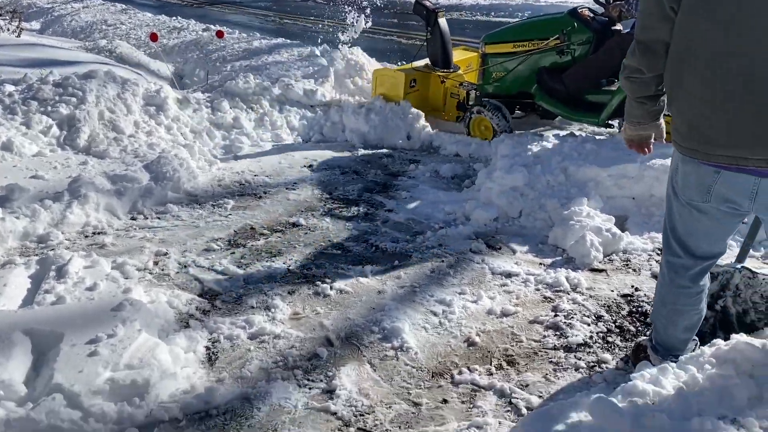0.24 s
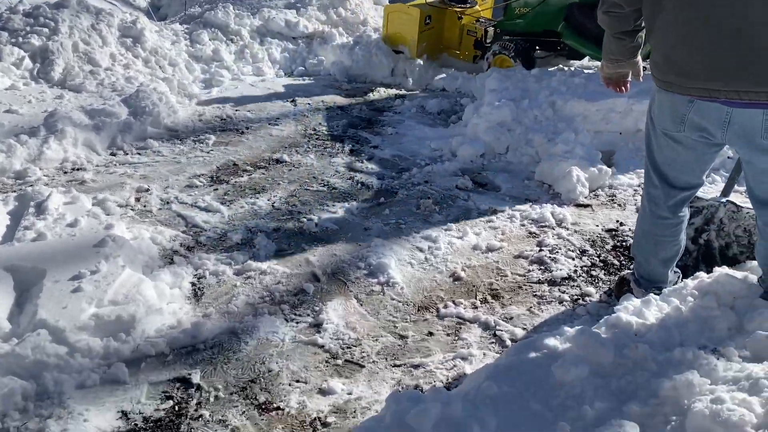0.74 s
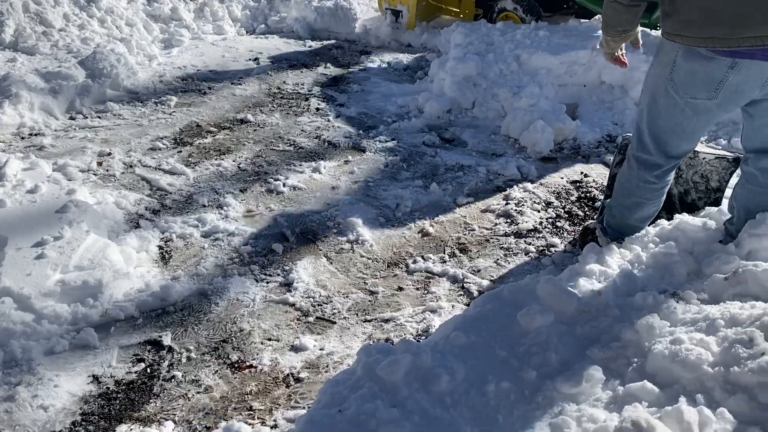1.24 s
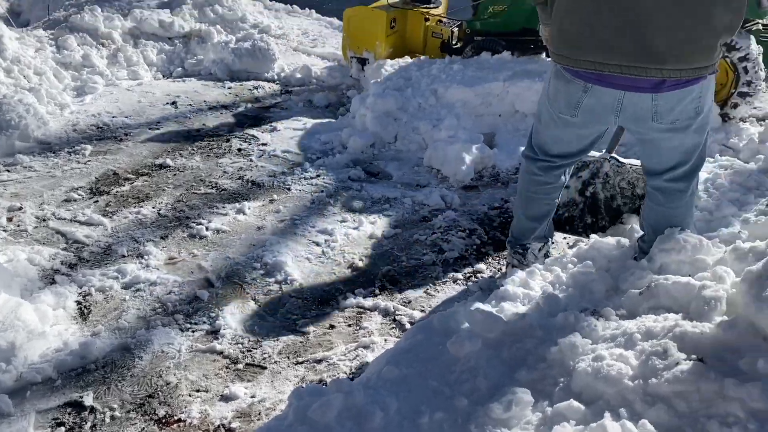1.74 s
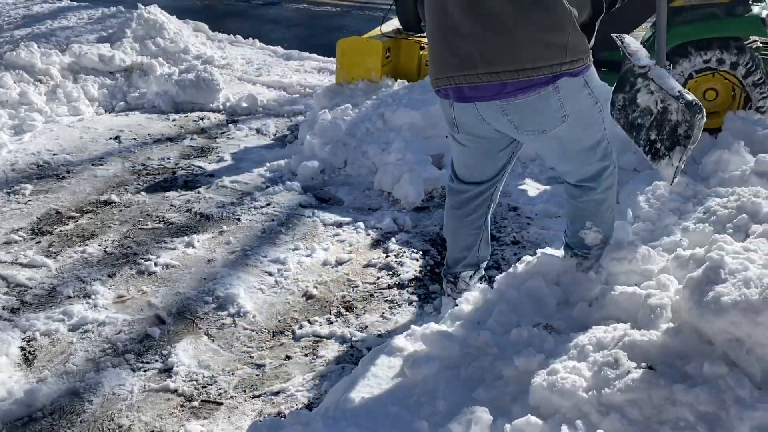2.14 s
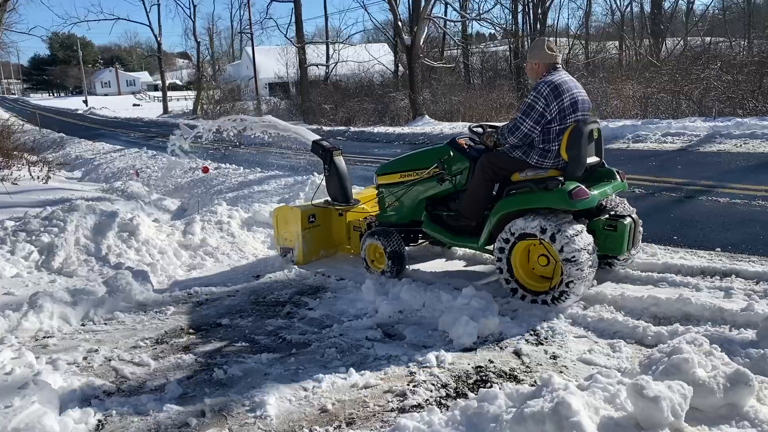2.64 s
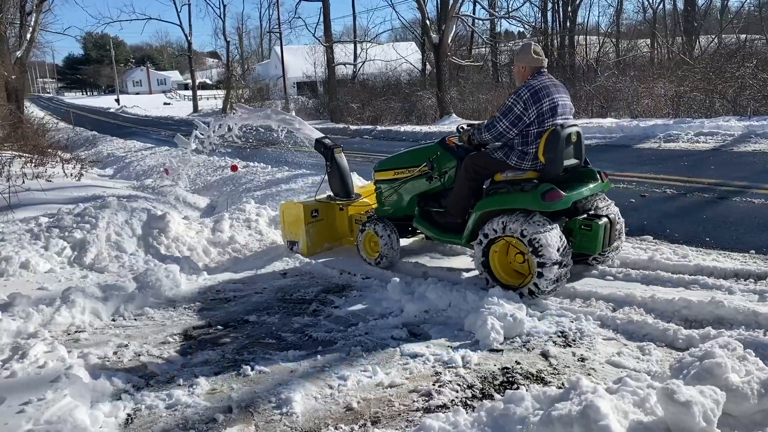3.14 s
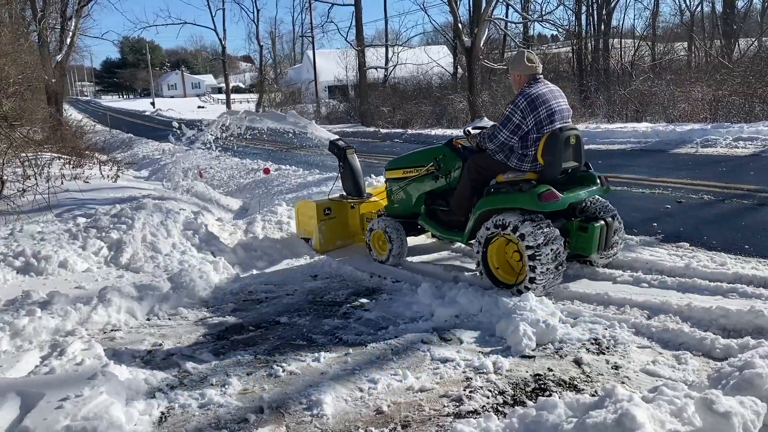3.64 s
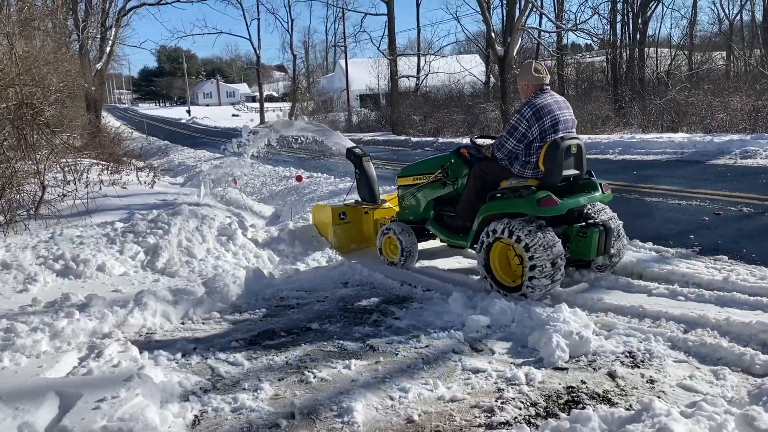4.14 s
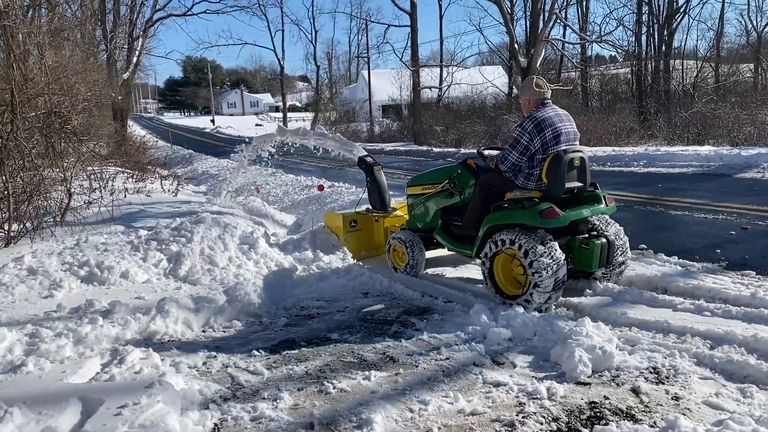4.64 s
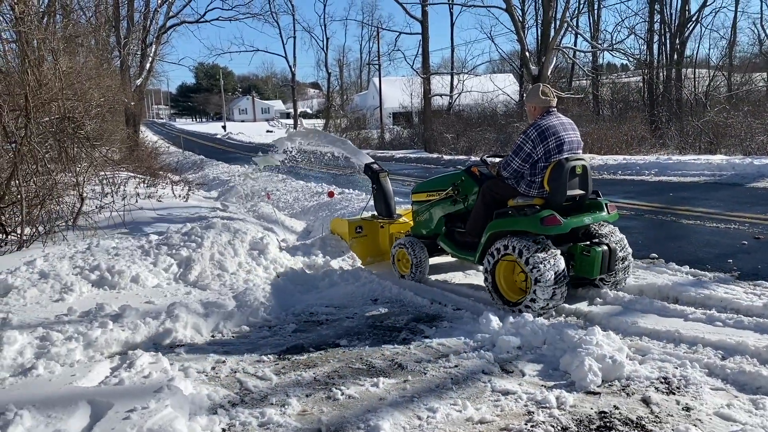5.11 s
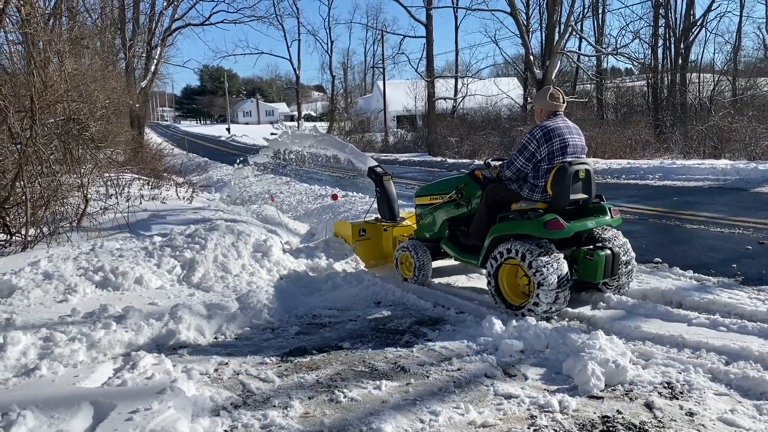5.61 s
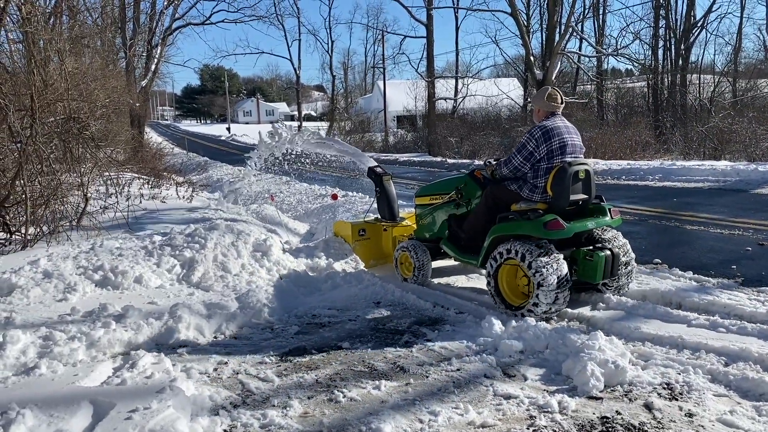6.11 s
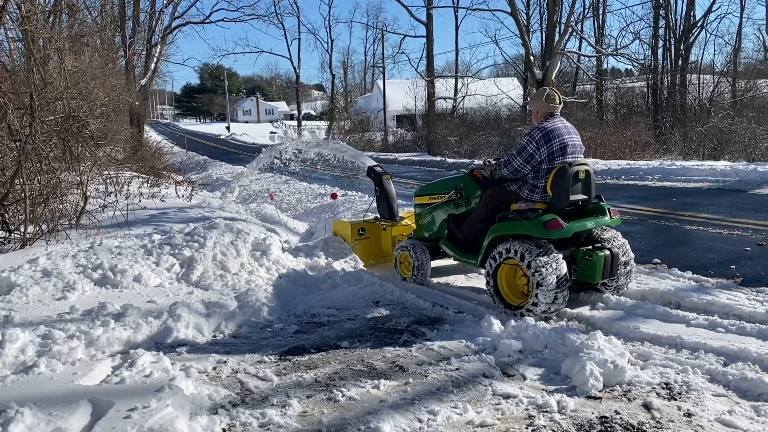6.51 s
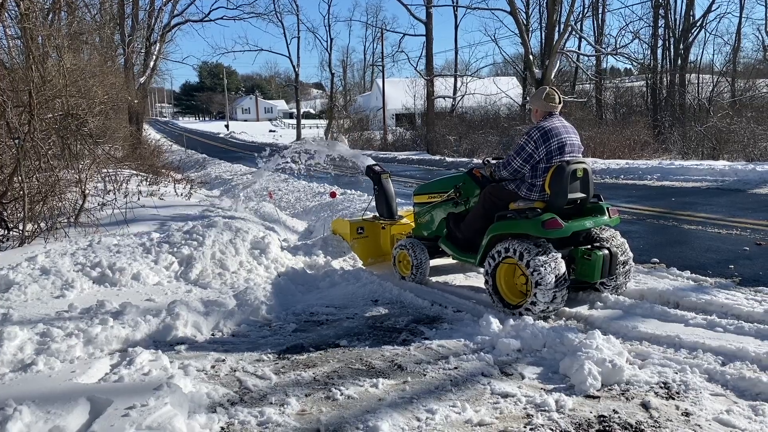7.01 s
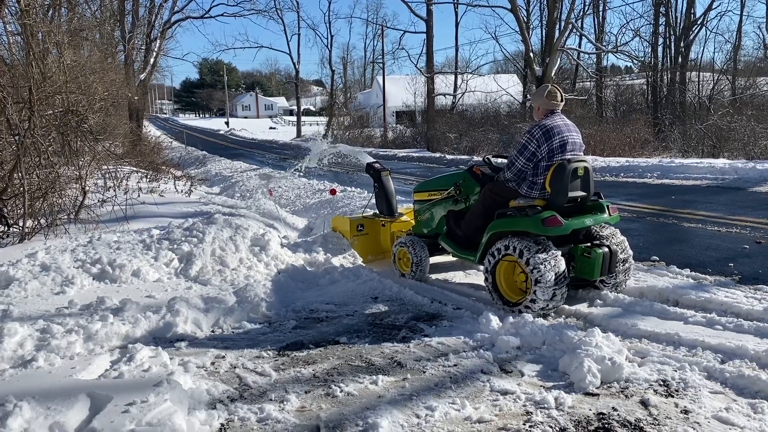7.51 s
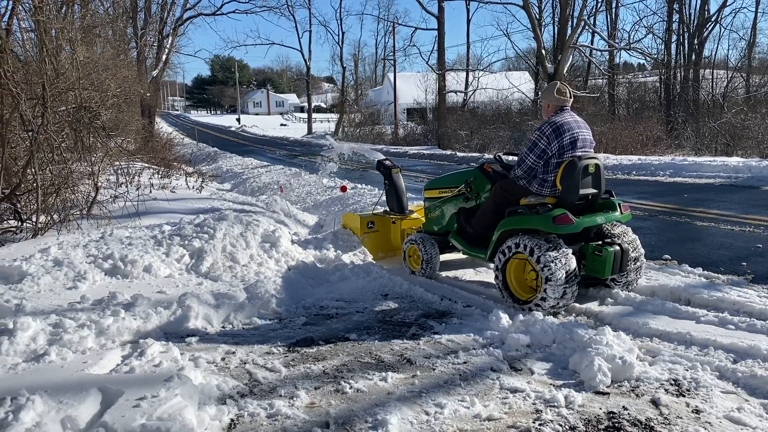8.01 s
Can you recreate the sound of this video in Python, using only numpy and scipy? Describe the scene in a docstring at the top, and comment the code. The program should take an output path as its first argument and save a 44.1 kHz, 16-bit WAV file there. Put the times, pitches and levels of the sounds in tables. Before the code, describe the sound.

A small tractor engine drones and clatters outdoors while its snowblower hums and hisses, then abruptly sounds closer, louder and more rattly.

```python
"""A V-twin garden tractor drives a front snowblower along a snowy driveway, a few metres from a stereo microphone.
Uneven firings drone and bark in the muffler, the governor hunts and the crank shakes the frame.
The impeller hums, noise through steel resonances makes the clatter and rattle, and snow hisses from the chute.
First the tractor is heard from the side, until a man steps in front and shades the treble;
then the place jumps: closer, from behind, the blower digging into snow as the tractor slowly turns away."""
import sys
import numpy as np
from scipy import signal
from scipy.fft import rfft, irfft, next_fast_len
from scipy.io import wavfile
from scipy.ndimage import uniform_filter1d, map_coordinates

SR = 44100
rng = np.random.default_rng(int(sys.argv[2]) if len(sys.argv) > 2 else 0)


def int16_out(signal):
    """Quantize to a 16-bit WAV file."""
    q = np.round(np.clip(np.atleast_2d(signal).T, -1, 1) * 32767)
    wavfile.write(sys.argv[1], SR, q.astype(np.int16))


N = 364266

# engine speed, one list from the side and one from behind: t/s, four-stroke cycle rate f/Hz
ENGINE_SPEED = [
    [(0.0, 25.47), (0.13, 25.11), (0.52, 24.29), (0.88, 25.9), (1.05, 26.06), (1.77, 24.23), (2.09, 25.85),
     (2.58, 25.9)],
    [(2.58, 25.1), (3.35, 25.11), (3.59, 24.43), (4.16, 25.08), (4.38, 24.22), (4.81, 23.88), (5.09, 25.47),
     (5.34, 24.55), (6.01, 25.86), (6.56, 24.82), (7.25, 26.23), (7.88, 25.76), (8.26, 25.99)],
]
# snow in the auger: t/s, load level/dB
SNOW_LOAD = [(0, -6.5), (.75, -5), (1.3, -6), (1.9, 3), (2.5, -1), (2.7, 1.5), (4.1, 1), (4.8, 5),
             (5.55, 2), (6.2, 0), (6.85, 0.5), (7.3, -2), (8.26, -2.5)]
# muffler drone from the side and from behind: f/cycle rate, relative level/dB
DRONE_SIDE = [(3, -12), (5, 3), (6, -0.5), (7, -12.5), (8, -1), (9, -9), (10, -27.5)]
DRONE_REAR = [(1, -41), (3, -10), (5, 3.5), (6, -3), (7, -19), (8, -4.5), (9, -11), (10, -17.5)]
# tailpipe's bark: f/cycle rate, relative level/dB
TAILPIPE_ORDERS = [(9, -8.5), (10, -25), (11, 5), (12, -0.5), (13, -2), (14, -2.5), (15, -6.5), (16, -13.5),
                   (17, -8), (18, -10), (19, -11)]

# noise spectra of gas puff, auger, engine clatter, knock, blower rattle, housing and snow spray:
# f/Hz, relative level per Hz/dB
GAS_SPECTRUM = [(150, -9), (230, -3), (280, 2), (340, -0.5), (430, 0.5), (520, -11.5), (650, -11),
                (900, -8.5)]
RUMBLE_SPECTRUM = [(25, -38), (45, -4), (70, -12), (95, -6.5), (125, -6.5), (170, -10.5), (240, -13.5),
                   (400, -20)]
CLATTER_SPECTRUM = [(300, -16), (550, 0.5), (800, -3.5), (1050, -2.5), (1350, -4), (1650, -4), (1900, -6.5),
                    (2500, -24)]
KNOCK_SPECTRUM = [(450, -10), (700, -18), (900, 3.5), (1200, -5), (1400, -17), (1700, -10), (2400, -13)]
RATTLE_SPECTRUM = [(1300, -15.5), (1900, -1), (2500, 1.5), (3000, 1), (3400, -18.5), (4300, -15)]
HOUSING_SPECTRUM = [(2700, -8.5), (3500, 1.5), (4200, 0.5), (4850, 3), (5100, -15), (5700, -15.5),
                    (7000, -28)]
HISS_SPECTRUM = [(3500, 4.5), (5200, 3), (5700, -1), (7000, 3), (8600, 3), (9300, 0), (11500, -0.5),
                 (12800, -14.5), (15800, -5.5)]
# sheet-steel resonances facing each place: f/Hz, width/Hz, lift/dB
STEEL_SIDE = [(900, 33, 5), (1210, 89, 5), (1490, 130, 1.5), (2104, 28, 8.5), (2430, 130, 5.5),
              (2655, 72, 7.5), (2942, 110, 6.5), (3310, 27, 12.5), (3940, 59, 8), (4300, 55, 8.5),
              (5110, 160, 7), (5630, 730, 7), (6660, 120, 7.5), (7580, 260, 7)]
STEEL_REAR = [(742, 21, 4.5), (857, 130, 6.8), (1087, 220, 5.7), (1203, 79, 4.1), (1503, 137, 7.9),
              (1674, 156, 5.3), (2143, 49, 6.4), (2500, 41, 4.2), (3260, 66, 6.3), (4000, 200, 1.6),
              (7080, 65, 3.6), (7500, 120, 7.5), (7630, 84, 3.1), (8750, 160, 2.3)]

# gear tones against the contact noise, before GEAR_DB: f/cycle rate, level/dB
GEAR_TONES = [(33, -31), (34, -31), (35, -26.5), (37, -31), (40, -27.5), (41, -27.5), (54, -30), (60, -31),
              (62.1, -31), (67, -33), (70, -27.5), (80.25, -28), (96.6, -27)]
# swelling gear tones, before flutter: t/s, half length/s, f/cycle rate, peak level/dB
GEAR_WHINES = [(.3, .1, 67, -42), (.58, .11, 98, -38.5), (.6, .4, 100.8, -42), (.92, .18, 80.6, -36.5),
               (2.4, .2, 47.4, -42), (4.6, .28, 77.6, -36), (7.4, .35, 80.1, -37.5)]
# impeller with three blades and a 25-tooth worm gear: f/turning rate, relative level/dB, dB per dB of load
IMPELLER_TONES = [(6, 0, 2.0), (9, -2, 0), (12, -8, .3), (15, -9, 1.8), (25, -8.5, 1.9), (27, -8.5, .8),
                  (30, -12, .6), (33, -15, 1), (36, -16, .4)]
# thin steely ring: t/s, half length/s, peak level/dB
RING_SWELLS = [(1.254, 0.55, -41), (3.26, 0.19, -43)]
# blower modes facing the microphone in turn: f/Hz, width/Hz, level/dB, from t/s, until t/s, half fade/s
BLOWER_MODES = [(3650, 140, -45, 2.3, 3.6, .15), (3774, 204, -35, 3.4, 9, 0.37),
                (4000, 100, -46, 3.6, 4.1, .15), (3965, 100, -44, 6.5, 9, .2),
                (4200, 160, -34, 1.9, 2.8, .15), (4370, 150, -39.5, 2.4, 4.1, 0.098),
                (4660, 164, -38, 2.8, 9, 0.11), (4784, 125, -43, 2.7, 9, 0.13),
                (5220, 320, -44.5, 2.4, 4.1, .15), (7620, 350, -49, 2.1, 4, .15)]
# swelling and easing of the blower's ring from behind: t/s, level change/dB
WHIRR_SWELL = [(2.6, 0), (2.95, 3), (3.3, 0.5), (3.85, 3), (4.2, 0), (5.8, -1), (6.45, 2), (7.25, 0.6),
               (8.26, 1.5)]
# lumps of packed snow hitting the blower: t/s, level/dB, pitch f/Hz, t60/s, crunch against knock level/dB
SNOW_LUMPS = [(5.488, -13.5, 70, 0.25, -35), (6.74, -18.5, 80, 0.18, -35), (6.84, -19, 92, 0.18, -35),
              (7.2698, -6.5, 396, 0.06, -8)]
# struck housing modes: f/lump pitch, relative level/dB
LUMP_MODES = [(.42, -14), (.92, -6), (1, 0), (1.1, -4), (1.25, -9)]
# bounce off the ice as tractor and microphone move: t/s, detour/ms
ICE_BOUNCE = [(0, 1.03), (.4, 1.14), (.6, 1.3), (.74, 1.47), (1.15, 1.48), (1.38, 1.32), (1.6, 1.3),
              (2.03, 1.01), (2.25, 1.12), (2.58, 1.17)]
# difference between the microphones: f/Hz, side against mid level/dB
STEREO_WIDTH = [(60, -32), (110, -19.5), (220, -27), (380, -18.5), (700, -8), (1290, -10), (1600, -16),
                (1950, -8.5), (2450, -34), (3200, -6.5), (4400, -10), (5000, -2.5), (8500, -3),
                (15000, 1.5)]

# base level of each part: from the side/dB, from behind/dB, drift while the tractor turns away/(dB/s),
# dB per dB of snow load, change with the man fully in front/dB
DRONE_LEVEL = (-19.5, -17, -0.5, 0.06, 0.2)
SHAKE_LEVEL = (-30, -27, 0.1, 0.46, -1)
KNOCK_LEVEL = (-50.5, -38, -0.9, -0.1, -16)
BARK_LEVEL = (-32, -27, -0.17, 0.54, 1.5)
RUMBLE_LEVEL = (-33, -33, 0.87, 0.9, -11)
CLATTER_LEVEL = (-37.5, -26.5, -0.88, -0.29, 3)
RATTLE_LEVEL = (-34.5, -34.5, 0.29, 0.21, -11)
HOUSING_LEVEL = (-35.5, -34.5, 1.24, 0.5, -8)
HISS_LEVEL = (-37, -34, -0.17, 0.22, -7.5)
# first cylinder's reference firing from the side and from behind: t/s, t/s
FIRST_FIRING_S = (.0324, 2.6065)

JUMP_S = 2.581  # from the place beside the tractor to the one behind it
SHADOW_S, SHADOW_WIDTH_S = 2.29, 0.52  # the man passes between blower and microphone
VEE_CYCLES = 270 / 720  # firing interval as a share of the four-stroke cycle
# the governor adds gas when the engine is below its set speed and while it picks up
SET_HZ, DROOP_DB_PER_HZ, PICKUP_DB_PER_HZ_S = 24.85, 0.44, 0.11
MUFFLER_ORDER, MUFFLER_Q, SECOND_DB = 4.4, 6, -8  # order in multiples of the cycle rate
# the more snow load, the more the tailpipe speaks over the gas
PIPE_DB, PIPE_DB_PER_LOAD, GAS_DB = -4, 0.4, -4.5
SHAKE_LAG_DEG = 33  # crank degrees
SHAKE_OVERTONE_SIDE_DB, SHAKE_OVERTONE_REAR_DB = -1, -5.5
KNOCK_PICKUP_DB, KNOCK_PICKUP_HZ_S = 3.5, 1  # limit of the knock's growth, and scale of speed gain
GEAR_DB = 1.5
BELT_RATIO, BELT_SLIP_PER_DB = .6222, .0005  # impeller turns per engine cycle, slip share per dB of load
IMPELLER_SIDE_DB, IMPELLER_REAR_DB, IMPELLER_SURGE_DB = -44.5, -35, 2
HOUSING_FADE_S, HOUSING_FADE_DB = (3, 3.94), -4.5  # the broad ring of the housing drops back
RING_HZ, RING_DB = 6145, -50
WHIRR_FOLLOW = 0.23  # share of the engine's speed changes that the blower modes follow
LUMP_ATTACK_CYCLES = 1.4
BOUNCE_DB = -13.5
PORT_DB, YARD_DB = -10.5, 0  # phase difference and echoes, before the stereo width curve
TOP_HZ = 15800


def undb(db):
    """Decibels to gain."""
    return 10 ** (np.asarray(db) / 20)


def unit(x):
    """Scale to rms 1."""
    return x / np.sqrt(np.mean(x ** 2))


def clock():
    """Time of every sample in seconds."""
    return np.arange(N) / SR


def curves(table):
    """One value a sample for each column of a curve."""
    s, *columns = np.transpose(table)
    return [np.interp(clock(), s, column) for column in columns]


def ramp(span):
    """Rises from 0 to 1 over a span of seconds."""
    return np.interp(clock(), span, (0, 1))


def swell(s, length, db):
    """A gain that rises to its peak at s and dies away again."""
    return undb(db) * np.exp(-((clock() - s) / length) ** 2)


def walk(rate):
    """Smooth chance with a spread near 1, from random knots at a rate in Hz."""
    knots = rng.standard_normal(2048)
    return np.interp(clock() * rate, np.arange(len(knots)), knots) * 1.21


def shape(points, resonances=()):
    """Gain at every frequency: a smooth spectrum, 30 dB an octave beyond its ends, lifted by resonances."""
    f = np.fft.rfftfreq(N, 1 / SR)
    hz, db = np.transpose(points)
    octaves_below = np.maximum(np.log2(hz[0] / (f + 1)), 0)
    octaves_above = np.log2(np.maximum(f / hz[-1], 1))
    db = np.interp(np.log(f + 1), np.log(hz), db) - 30 * octaves_below - 30 * octaves_above
    for centre, width, lift in resonances:
        db = db + lift / (1 + (2 * (f - centre) / width) ** 2)
    return undb(db)


def colour(x, points, resonances=()):
    """Filter to a spectrum, rms 1."""
    size = next_fast_len(N)
    gain = np.interp(np.fft.rfftfreq(size), np.fft.rfftfreq(N), shape(points, resonances))
    return unit(irfft(rfft(x, size) * gain, size)[:N])


def resonance(hz, width_hz):
    """A mode shaken by countless small contacts: narrow noise around a pitch that may glide."""
    push = rng.standard_normal(N) + 1j * rng.standard_normal(N)
    slow = signal.sosfilt(signal.butter(1, width_hz / 2, fs=SR, output="sos"), push)
    slow = signal.sosfilt(signal.butter(2, width_hz * 0.34, fs=SR, output="sos"), slow)
    carrier = np.exp(2j * np.pi * np.cumsum(hz * np.ones(N)) / SR)
    return unit((slow * carrier).real)


def shadow():
    """How far the man blocks the line of sight, 0 to 1."""
    return np.exp(-((clock() - SHADOW_S) / SHADOW_WIDTH_S) ** 2)


def loudness(part, rear):
    """Level of a part in dB, from the microphone's place, the snow load and the man's shadow."""
    side_db, rear_db, turn_db_per_s, per_load, shadow_db = part
    beside_db = side_db + shadow_db * shadow()
    behind_db = rear_db + turn_db_per_s * (clock() - JUMP_S)
    return np.where(rear, behind_db, beside_db) + per_load * curves(SNOW_LOAD)[0]


def crank(speed, rear):
    """Engine cycles turned so far, slightly jittered; the first cylinder fires near each whole number."""
    turns = np.cumsum(speed) / SR
    beside, behind = np.interp(FIRST_FIRING_S, clock(), turns) % 1
    return 2 + turns - np.where(rear, behind, beside) + 0.00068 * walk(25)


def pickup(speed):
    """How fast the engine gains speed, in Hz a second."""
    return np.gradient(uniform_filter1d(speed, size=SR // 4)) * SR


def throttle(speed):
    """The governor's push in dB: more gas when the engine lags or accelerates."""
    return DROOP_DB_PER_HZ * (SET_HZ - speed) + PICKUP_DB_PER_HZ_S * pickup(speed)


def firings(cycle, width, second_db, scatter_db, lead=0.):
    """A short push for each cylinder; the vee spaces them 270 and 450 crank degrees apart."""
    out = 0
    for offset, db in ((0, 0), (-VEE_CYCLES, second_db)):
        turn = cycle - offset + lead + .5
        scatter = undb(scatter_db * rng.standard_normal(1024))
        size = undb(db) * scatter[turn.astype(int)]
        out = out + size * np.exp(-.5 * ((turn % 1 - .5) / width) ** 2)
    return out


def drone(cycle, orders, second_db, muffler_order, muffler_q, waver_db):
    """Multiples of the cycle at tabled levels, their phases set by the uneven firings and the muffler's resonance."""
    out = 0
    for k, db in orders:
        pair = 1 + undb(second_db) * np.exp(2j * np.pi * k * VEE_CYCLES)
        can = 1 / (1 + 1j * muffler_q * (k / muffler_order - muffler_order / k))
        phase = 2 * np.pi * k * cycle + np.angle(pair * can)
        out = out - undb(db + waver_db * walk(6)) * np.cos(phase)
    return unit(out)


def exhaust(cycle, speed, rear):
    """Low drone, and a sharper bark of tailpipe tones and gas puffs that grows with snow load."""
    beside = drone(cycle, DRONE_SIDE, SECOND_DB, MUFFLER_ORDER, MUFFLER_Q, waver_db=-0.65)
    behind = drone(cycle, DRONE_REAR, SECOND_DB, MUFFLER_ORDER, MUFFLER_Q, waver_db=0.14)
    low = undb(loudness(DRONE_LEVEL, rear)) * np.where(rear, behind, beside)
    pipe = drone(cycle + .07, TAILPIPE_ORDERS, second_db=-5, muffler_order=13, muffler_q=7, waver_db=1.2)
    puffs = 1 + firings(cycle, width=.07, second_db=-7, scatter_db=1, lead=.05)
    gas = colour(rng.standard_normal(N) * puffs, GAS_SPECTRUM)
    pipe_db = PIPE_DB + PIPE_DB_PER_LOAD * curves(SNOW_LOAD)[0]
    bark = undb(loudness(BARK_LEVEL, rear)) * (undb(pipe_db) * pipe + undb(GAS_DB) * gas)
    return undb(throttle(speed)) * (low + bark)


def shake(cycle, rear):
    """The unbalanced crank shakes the tractor once a revolution, just after top dead centre, with an overtone."""
    angle = 4 * np.pi * cycle - np.radians(SHAKE_LAG_DEG)  # two revolutions a cycle
    overtone = undb(np.where(rear, SHAKE_OVERTONE_REAR_DB, SHAKE_OVERTONE_SIDE_DB))
    return undb(loudness(SHAKE_LEVEL, rear)) * unit(np.cos(angle) + overtone * np.cos(2 * angle))


def chatter(cycle, repeat):
    """Dense metal contacts, a share of which comes back alike on every engine cycle."""
    pattern = rng.standard_normal(1760)
    locked = map_coordinates(pattern, [cycle % 1 * len(pattern)], order=3, mode="grid-wrap")
    share = np.clip(repeat, 0, 1)
    return np.sqrt(share) * locked + np.sqrt(1 - share) * rng.standard_normal(N)


def knock(cycle, speed, rear):
    """One cylinder raps hard once a cycle, the other faintly; both grow while the engine picks up."""
    strokes = firings(cycle, width=.04, second_db=-14, scatter_db=.7, lead=.16)
    pickup_db = KNOCK_PICKUP_DB * np.tanh(pickup(speed) / KNOCK_PICKUP_HZ_S)
    rap = colour(chatter(cycle, repeat=0.42) * strokes, KNOCK_SPECTRUM)
    return undb(loudness(KNOCK_LEVEL, rear) + pickup_db) * rap


def auger(rear):
    """Snow tumbles in the auger with a dull, randomly surging rumble of filtered noise."""
    surge_db = 1.2 * walk(7)
    return undb(loudness(RUMBLE_LEVEL, rear) + surge_db) * colour(rng.standard_normal(N), RUMBLE_SPECTRUM)


def impeller(cycle, rear):
    """Blades and worm gear hum on their own pitch; packed snow swells them and slips the belt."""
    load = curves(SNOW_LOAD)[0]
    turning = np.gradient(cycle) * BELT_RATIO * (1 - BELT_SLIP_PER_DB * load)
    turns = np.cumsum(turning) + rng.random()
    hum = 0
    for k, db, per_load in IMPELLER_TONES:
        tone_db = db + per_load * load + IMPELLER_SURGE_DB * walk(3)
        hum = hum + undb(tone_db) * np.sin(2 * np.pi * k * turns + .5 * walk(2))
    return undb(np.where(rear, IMPELLER_REAR_DB, IMPELLER_SIDE_DB)) * np.sqrt(2) * hum


def blower_throb(cycle):
    """A regular throb of the blower, six and a half times an engine cycle."""
    return np.cos(2 * np.pi * 6.5 * cycle)


def gear_tones(cycle):
    """Wavering tones tied to the engine cycle, as the gears mesh."""
    out = 0
    for k, db in GEAR_TONES:
        gain = undb(GEAR_DB + db + 2.5 * walk(12))
        out = out + gain * np.sin(2 * np.pi * k * cycle + .65 * walk(25))
    return out


def machinery(cycle, rear):
    """Valves, gears, impeller and flying snow excite the sheet steel of tractor and blower."""
    throb = blower_throb(cycle)
    gears = gear_tones(cycle)
    second_db = np.where(rear, -14, 3)
    valves = 1 + .42 * firings(cycle, width=.04, second_db=second_db, scatter_db=1, lead=.15)
    clatter = chatter(cycle, repeat=0.44) * valves + gears
    rattle = chatter(cycle, repeat=0.23) * (1 + 0.087 * throb) + gears
    housing = chatter(cycle, repeat=0.13) * (1 + 0.031 * throb)
    flicker_db = 0.74 * walk(200) + 0.31 * walk(13)
    hiss = rng.standard_normal(N) * (1 + 0.029 * throb) * undb(flicker_db)
    housing_db = loudness(HOUSING_LEVEL, rear) + rear * curves(WHIRR_SWELL)[0]
    housing_db = housing_db + HOUSING_FADE_DB * ramp(HOUSING_FADE_S)
    layers = [(clatter, CLATTER_SPECTRUM, loudness(CLATTER_LEVEL, rear)),
              (rattle, RATTLE_SPECTRUM, loudness(RATTLE_LEVEL, rear)),
              (housing, HOUSING_SPECTRUM, housing_db),
              (hiss, HISS_SPECTRUM, loudness(HISS_LEVEL, rear))]
    out = 0
    for force, spectrum, db in layers:
        beside = colour(force, spectrum, STEEL_SIDE)
        behind = colour(force, spectrum, STEEL_REAR)
        out = out + undb(db) * np.where(rear, behind, beside)
    return out


def ground(x, rear):
    """Beside the tractor the bounce off the ice combs the sound; the comb sweeps as the path changes."""
    lag = curves(ICE_BOUNCE)[0] / 1000 * SR  # ms to samples
    echo = map_coordinates(x, [np.arange(N) - lag], order=3)
    return x + undb(BOUNCE_DB) * (1 - rear) * echo


def yard(x, t60=0.05):
    """Diffuse echoes from snowbanks and trees: decaying noise of unit energy."""
    t = np.arange(SR // 2) / SR
    response = rng.standard_normal(len(t)) * undb(-60 * t / t60)
    return signal.fftconvolve(x, response / np.linalg.norm(response))[:N]


def whines(cycle):
    """Now and then one gear tone swells out of the clatter, its pitch tied to the engine."""
    backlash = .7 * walk(30)
    flutter_db = 2 * walk(20)
    out = 0
    for s, length, k, db in GEAR_WHINES:
        out = out + swell(s, length, db) * np.sin(2 * np.pi * k * cycle + backlash)
    return undb(flutter_db) * out


def steel_ring(rear):
    """A thin high mode, faintly there from behind, that swells now and then."""
    swells = sum(swell(s, length, db) for s, length, db in RING_SWELLS)
    steady = rear * undb(RING_DB)
    return (steady + swells) * resonance(RING_HZ, width_hz=210)


def whirr(cycle, speed, rear):
    """Heard from behind, the blower sings in throbbing modes that come and go."""
    stretch = (1 + WHIRR_FOLLOW * (speed / SET_HZ - 1)) * (1 + 0.003 * walk(8))
    out = 0
    for hz, width_hz, db, start, end, fade in BLOWER_MODES:
        facing = ramp((start - fade, start + fade)) - ramp((end - fade, end + fade))
        out = out + undb(db) * facing * resonance(hz * stretch, width_hz)
    return rear * undb(curves(WHIRR_SWELL)[0]) * out * (1 + .3 * blower_throb(cycle))


def lumps():
    """Each lump gives a hollow knock, sharp at first and then sagging in pitch, and a brief crunch."""
    out, t = np.zeros(N), np.arange(SR // 3) / SR
    crunch_band = signal.butter(3, [750, 1450], "band", fs=SR, output="sos")
    sag = t + .0012 * (1 - np.exp(-t / .004))  # time runs fast at first
    for s, db, hz, t60, crunch_db in SNOW_LUMPS:
        modes = sum(undb(mode_db) * np.sin(2 * np.pi * hz * ratio * sag) for ratio, mode_db in LUMP_MODES)
        attack = 1 - np.exp(-(t * hz / LUMP_ATTACK_CYCLES) ** 2)
        hollow = modes * undb(-60 * t / t60) * attack
        crunch = unit(signal.sosfilt(crunch_band, rng.standard_normal(len(t)))) * np.exp(-t / 0.0065)
        start = int(s * SR)
        hit = hollow / np.abs(hollow).max() + undb(crunch_db) * crunch
        out[start:start + len(t)] += undb(db) * hit
    return out


def scene():
    """The two microphones hear the tractor slightly out of phase, and the yard's echoes differently."""
    speed = curves(np.vstack(ENGINE_SPEED))[0]
    rear = (clock() > JUMP_S).astype(float)
    cycle = crank(speed, rear)
    engine = exhaust(cycle, speed, rear) + shake(cycle, rear) + knock(cycle, speed, rear) + whines(cycle)
    blower = auger(rear) + impeller(cycle, rear) + whirr(cycle, speed, rear) + steel_ring(rear) + lumps()
    mid = engine + ground(machinery(cycle, rear), rear) + blower
    quarter_turn = 1j * undb(PORT_DB) * rfft(mid)  # 90 degrees of phase
    echoes = undb(YARD_DB) * rfft(yard(mid))
    side = irfft((quarter_turn + echoes) * shape(STEREO_WIDTH), N)
    return np.array([mid + side, mid - side])


def record(dry):
    """The level dips for an instant at the jump; the top is cut off steeply."""
    dip = np.clip(np.abs(clock() - JUMP_S + .003) / .012, .2, 1)
    return signal.sosfilt(signal.ellip(10, .1, 80, TOP_HZ, fs=SR, output="sos"), dry * dip)


dry = scene()
out = record(dry)
int16_out(out)
```